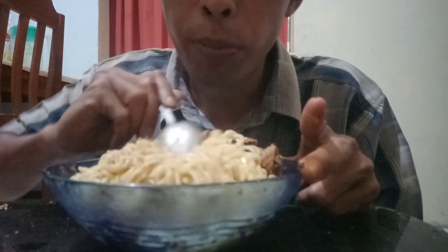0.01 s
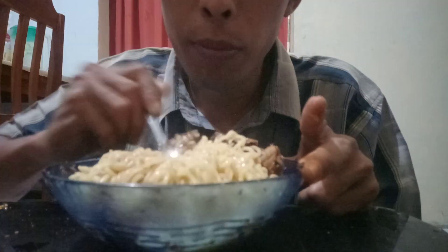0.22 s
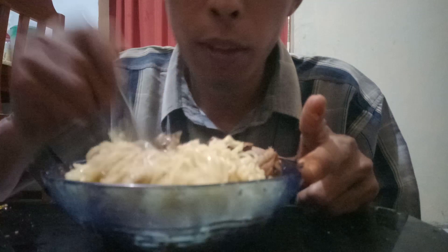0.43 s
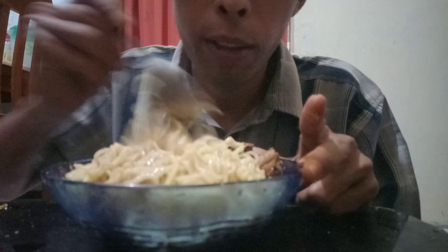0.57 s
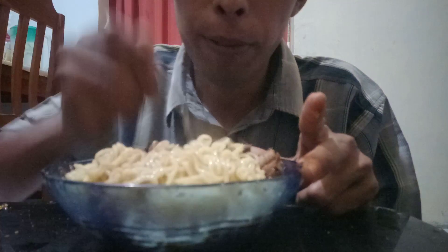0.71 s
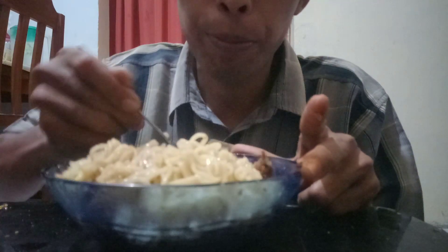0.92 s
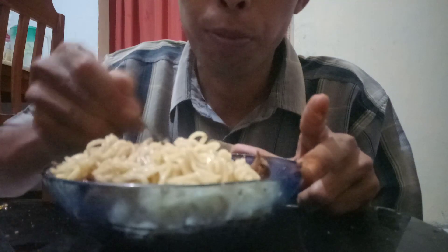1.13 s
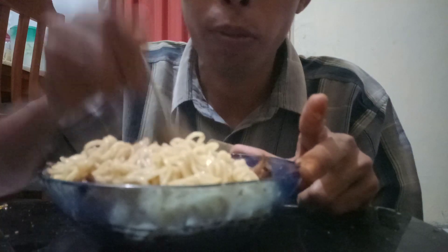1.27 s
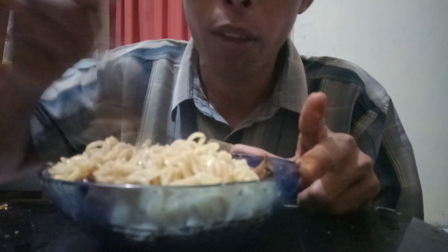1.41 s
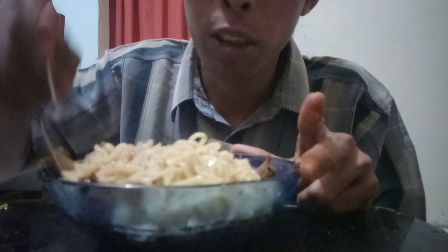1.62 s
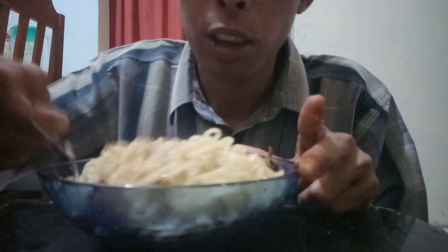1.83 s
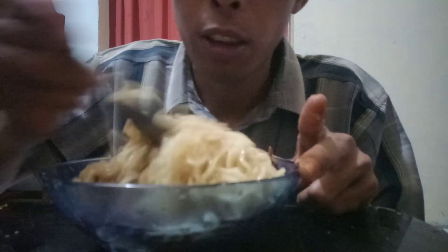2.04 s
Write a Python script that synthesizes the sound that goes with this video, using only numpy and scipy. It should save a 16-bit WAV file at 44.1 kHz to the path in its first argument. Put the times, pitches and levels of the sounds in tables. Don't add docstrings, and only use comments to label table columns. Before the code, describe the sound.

Close up in a small echoing room, a spoon strikes glass sharply, bumps the bowl on the table, goes quieter, then knocks and scrapes again through noodles while crickets and insects sing faintly outside.

```python
import sys
import numpy as np
from scipy import signal
from scipy.fft import rfft, irfft
from scipy.io import wavfile
from scipy.ndimage import uniform_filter1d

SR = 44100
rng = np.random.default_rng(int(sys.argv[2]) if len(sys.argv) > 2 else 0)


def transcribe(signal):
    frames = np.atleast_2d(signal).T
    limited = np.clip(frames, -1, 1)
    pcm = np.round(limited * 32767).astype(np.int16)
    wavfile.write(sys.argv[1], SR, pcm)


def natural_amplitude(level_db):
    exponent = np.asarray(level_db, float) / 20
    return 10 ** exponent


N = 90405
t = np.arange(N) / SR

# frequency in [Hz], level in [dB].
AIR_COLOUR = [(24, -66.5), (40, -10), (222, -5.5), (462, -16), (529, -15.5), (925, -23), (4000, -24.5),
              (5200, -38), (8800, -120)]
AIR_DB, AIR_WANDER_DB = -68.5, 1.5
HISS_DB, TOP_HISS_DB, TOP_HISS_HZ = -89.5, -84, 15200

# centre in [Hz], width in [Hz], level in [dB].
CICADA_BANDS = [(6600, 550, -61), (7216, 420, -66)]
# start in [s], level in [dB].
CHIRPS = [(-.25, -58), (.062, -54), (.3, -50), (.51, -52), (.72, -61.5), (.955, -57.5), (1.19, -58.5),
          (1.405, -60), (1.625, -59.5), (1.85, -59.5)]
STROKES, STROKE_S, STROKE_GAP_S = 4, 0.0181, 0.035
FROM_HZ, TO_HZ, STROKE_SPREAD = 5150, 4348, 0.04
YARD_T60_S, YARD_DB = 0.5, 7
CRICKET_HZ, CRICKET_WIDTH_HZ, CRICKET_BED_DB = 4800, 1000, -67.5

# frequency in [Hz], time to fall 60 dB in [s].
ROOM_T60 = [(300, 0.62), (1200, 0.21), (3500, 0.22), (7000, 0.44), (12000, 0.26)]
ROOM_DB, ROOM_GAP_S = -8.5, 0.0091
WALL_TOP_HZ = 9500
RING_WET_DB = -11

# time in [s], level in [dB].
SHIFT_LEVEL = [(0, -61), (.11, -57), (.15, -79), (.3, -103)]
# centre in [Hz], width in [Hz], level in [dB].
SHIFT_BODY = [(620, 125, -2.5), (830, 77, -8.5), (1180, 410, -10.5)]
# time in [s], level in [dB].
DRAG_LEVEL = [(0, -69.5), (.14, -65.5), (.2, -59.5), (.4, -57), (.47, -79), (.85, -73.5), (1.05, -77),
              (1.43, -92), (1.46, -65), (1.6, -63), (1.75, -57.5), (2.05, -63)]
# centre in [Hz], width in [Hz], level in [dB].
DRAG_BODY = [(543, 400, -7), (954, 161, -1), (1320, 100, -45), (1800, 130, -14.5)]
# time in [s], level in [dB].
SCRAPE_LEVEL = [(0, -66.5), (.215, -74), (.235, -39), (.3, -49), (.36, -64), (.45, -61.5), (.5, -69),
                (1.5, -86), (1.65, -58.5), (1.8, -53.5), (2.05, -58)]
# centre in [Hz], width in [Hz], level in [dB].
SCRAPE_BODY = [(3640, 700, -3.5), (4790, 760, -3.5), (6080, 1270, 5), (2590, 700, -11), (8900, 760, -28.5)]
CLICK_SCATTER_DB = 1.5

# frequency in [Hz], level in [dB], time to fall 60 dB in [s].
SPOON_MODES = [(6710, 0, .09), (6612, -7, .12), (4862, -8, .05), (4160, -5, .04), (7200, -14, .05),
               (5150, -13, .05), (2230, -10, .04), (12100, -38, .1)]
# frequency in [Hz], level in [dB], time to fall 60 dB in [s].
BOWL_MODES = [(6125, -1, .06), (6185, -7, .1), (6400, -6, .04), (3527, 1, .08), (4157, -7, .06),
              (1710, -8, .04), (4895, -10, .04), (1034, -7, .08)]
# frequency in [Hz], level in [dB], time to fall 60 dB in [s].
TABLE_MODES = [(152, -4, .65), (181, 4, .2), (213, -3, .1), (67, -6.5, .11), (129, -1, .14)]
# frequency in [Hz], level in [dB], time to fall 60 dB in [s].
BOARD_MODES = [(256.5, -4, 0.13), (319, -7.5, 0.36), (408.4, -6.5, 0.051), (425, -8, 0.11),
               (549, -2.5, 0.05), (620, 0.5, 0.04), (763, -8, 0.038), (1050, -9, 0.1), (2230, -39, 0.029)]
TABLE_LATE_S = 0.004
HOLD_S, STOP_S, ATTACK_S = 0.0062, 0.0008, 0.000079
SPOON_DAMPED_DB, BOWL_DAMPED_DB = -21, -13

# start in [s], level in [dB], frequency in [Hz], rise time in [s].
TAPS = [(1.6873, -22, 426, 0.00093), (1.6945, -27.5, 416.5, 0.0018), (1.708, -42.5, 455, 0.0052),
        (1.7, -43.5, 1025, 0.0093), (1.752, -47.5, 1050, .005), (1.76, -43.5, 550, 0.0049),
        (1.769, -56, 1000, 0.0024), (0.4707, -39, 199, 0.0029), (.479, -42.5, 289, 0.0042),
        (.488, -48.5, 432.7, 0.0055), (.498, -46.5, 496, 0.0014), (0.57, -52, 198, 0.0035),
        (.55, -64, 620, 0.0055), (0.6972, -34, 191, 0.0016), (.699, -45.5, 1240, 0.0024),
        (.699, -53, 1680, .003), (.699, -45.5, 2580, 0.0015), (.706, -45, 516, 0.0056),
        (.722, -39, 490, 0.002), (0.789, -50, 391, 0.0076), (0.817, -60, 1077, 0.0032),
        (.821, -57, 485, 0.0033), (1.184, -52.5, 491, 0.0036), (1.2, -56.5, 1051, .006),
        (1.208, -50.5, 198, 0.0031), (1.221, -51, 182, 0.0023), (1.232, -63, 1120, 0.0026),
        (1.352, -67, 3330, .0012), (1.353, -57, 5200, 0.00084), (1.3634, -50, 3380, 0.00098),
        (1.363, -51, 5080, .0012), (1.3685, -54, 3180, .0012), (1.383, -48, 3170, 0.0012),
        (1.383, -49.5, 4450, 0.0011), (1.3845, -56.5, 1800, 0.0018), (1.397, -61, 2880, 0.0022),
        (1.401, -63, 2500, 0.002), (1.416, -66, 2950, 0.0014), (1.419, -75, 1780, 0.0017)]
# start in [s], level in [dB], frequency in
# [Hz], time to fall 60 dB in [s].
PINGS = [(0.2064, -38.5, 6700, 0.22), (.25, -54, 319, .5), (.33, -70, 11500, 0.0051),
         (.362, -38, 14700, 0.0068), (0.363, -46, 12700, 0.0068), (.382, -66, 8200, 0.016),
         (.42, -61, 10100, .008), (.445, -66, 11500, .006), (.5, -68, 270, 0.29), (.573, -62, 1800, .026),
         (.675, -57, 15000, .006), (0.698, -31.5, 2230, .019), (.698, -62.5, 8480, .046),
         (.6987, -27.5, 783, 0.023), (.7, -62, 12000, 0.007), (.7, -55, 15200, 0.0066),
         (0.741, -46, 319, 0.47), (.771, -51, 3440, 0.011), (.8, -70, 3500, 0.93),
         (0.94, -69.5, 315.5, 0.79), (1.186, -52.5, 3530, 0.052), (1.186, -47, 4470, 0.026),
         (1.279, -66, 321.3, 1.35), (1.355, -74, 10600, .017), (1.559, -57, 71.5, 0.15),
         (1.689, -33.5, 315, 0.025), (1.748, -37, 4166, 0.034), (1.757, -35, 4116, 0.055),
         (1.7635, -30, 4120, 0.023), (1.759, -26, 6440, 0.016), (1.768, -26, 6570, 0.017),
         (1.756, -52, 13200, .015), (1.7645, -57, 13210, .007), (1.757, -48, 15210, .015),
         (1.79, -52, 322, 1.3), (1.966, -64, 9400, 0.014), (.3, -48.5, 151.7, 1.3), (.54, -52.5, 152, .9),
         (.77, -48.5, 150.9, 1.24), (1.712, -49, 3520, 0.069), (1.714, -34, 6200, 0.078),
         (1.776, -40.5, 6240, 0.1), (1.84, -50, 271, 0.87), (.225, -62, 12000, .12)]
# start in [s], low thud in [dB], top-board knock in [dB],
# noodle slap in [dB], top of the slap in [Hz].
THUDS = [(.094, -55.5, -46, -78, 848), (.2215, -48, -27.5, -33.5, 6600), (.361, -43, -40.5, -50, 1350),
         (.471, -43.5, -46, -55.5, 900), (.572, -50.5, -52, -71, 2200), (.6985, -34.5, -29, -46, 2750),
         (.82, -50, -52, -69, 1200), (1.181, -48.5, -47, -50.5, 5600), (1.449, -81, -60, -66, 1440),
         (1.512, -76, -54, -53.5, 1050), (1.555, -64, -66, -54, 1020), (1.6875, -35.5, -38.5, -62, 520),
         (1.75, -40, -51, -50, 2090), (1.777, -28.5, -53, -72, 600), (.238, -31, -55, -60, 600),
         (1.703, -30, -33, -39, 478)]
SLAP_T60_S, SLAP_LOW_HZ = 0.09, 280
# start in [s], spoon ring in [dB], bowl ring in [dB], contact crack in [dB].
CLINKS = [
    (.2210, -14.5, -48, -21),
    (.381, -65, -56, -42),
    (1.6873, -38, -25, -26),
    (1.704, -82, -36, -52),
    (1.757, -42, -41, -35),
    (1.7645, -64, -43, -37),
]
# frequency in [Hz], level in [dB].
CRACK_COLOUR = [(200, -23), (900, 1), (1550, -11), (2200, -1), (3000, -18), (4400, 1), (7400, -5),
                (8400, -18)]
CRACK_T60_S, GRIT_SAMPLES = 0.06, 8000


def unit(x):
    return x / np.sqrt(np.mean(x ** 2))


def band(x, hz, width, order=1):
    edges = np.clip([hz - width / 2, hz + width / 2], 10, .45 * SR)
    return signal.sosfilt(signal.butter(order, edges, "bandpass", fs=SR, output="sos"), x)


def colour(x, table):
    points = np.array(table, float)
    hz = np.maximum(np.arange(2049) * SR / 4096, 1)
    gain_db = np.interp(np.log(hz), np.log(points[:, 0]), points[:, 1])
    cepstrum = irfft(np.log(natural_amplitude(gain_db)))
    cepstrum[1:2048] *= 2
    cepstrum[2049:] = 0
    return signal.fftconvolve(x, irfft(np.exp(rfft(cepstrum))))[:len(x)]


def curve(table):
    points = np.array(table)
    return natural_amplitude(np.interp(t, points[:, 0], points[:, 1]))


def walk(rate):
    k = int(SR / rate)
    steps = np.repeat(rng.standard_normal(N // k + 1), k)
    return unit(uniform_filter1d(uniform_filter1d(steps, k), k)[:N])


def add(out, s, sound):
    i = int(s * SR)
    out[i:i + len(sound)] += sound[:N - i]


def noise_band(hz, width, order=1):
    return unit(band(rng.standard_normal(N), hz, width, order))


def air():
    tone = unit(colour(rng.standard_normal(N), AIR_COLOUR + [(8000, -43.5)]))
    tone = tone * natural_amplitude(AIR_DB + AIR_WANDER_DB * walk(8.15))
    hiss = noise_band(9700, 1800) * natural_amplitude(HISS_DB)
    return tone + hiss + noise_band(TOP_HISS_HZ, 1200, order=2) * natural_amplitude(TOP_HISS_DB)


def crickets():
    lead = SR // 2
    u = t[:int(STROKE_S * SR)]
    dry = np.zeros(N + SR)
    turns = FROM_HZ * u + (TO_HZ - FROM_HZ) * u ** 2 / (2 * STROKE_S)
    swell = np.sin(np.pi * u / STROKE_S) ** 2
    for s, db in CHIRPS:
        for j in range(STROKES):
            i = int((s + .5 + j * STROKE_GAP_S) * SR)
            pitch = 1 + STROKE_SPREAD * rng.standard_normal()
            stroke_db = db + 1.9 * rng.standard_normal() - 2.9 * j
            dry[i:i + len(u)] += natural_amplitude(stroke_db) * np.sin(2 * np.pi * turns * pitch) * swell
    yard = rng.standard_normal(SR) * natural_amplitude(-60 * t[:SR] / YARD_T60_S)
    echo = signal.fftconvolve(dry, yard / np.sqrt(np.sum(yard ** 2)))[:N + SR]
    wet = dry + natural_amplitude(YARD_DB) * echo
    return wet[lead:lead + N]


def insect_chorus():
    out = noise_band(CRICKET_HZ, CRICKET_WIDTH_HZ, order=4) * natural_amplitude(CRICKET_BED_DB)
    for hz, width, db in CICADA_BANDS:
        grain_db = 0.98 * walk(7.6) + 1.34 * walk(80)
        out += noise_band(hz, width, order=3) * natural_amplitude(db + grain_db)
    return out


def room(x):
    u = t[:SR]
    tail = sum(band(rng.standard_normal(SR), hz, hz * 2.1) * natural_amplitude(-60 * u / t60) for hz, t60 in ROOM_T60)
    tail = signal.sosfilt(signal.butter(2, WALL_TOP_HZ, fs=SR, output="sos"), tail)
    tail = tail * np.clip(u / ROOM_GAP_S - 1, 0, 1)
    return natural_amplitude(ROOM_DB) * signal.fftconvolve(x, tail / np.sqrt(np.sum(tail ** 2)))[:N]


def rub(level, body, rate):
    hits = rng.random(N) < rate / SR
    clicks = hits * rng.standard_normal(N) * natural_amplitude(CLICK_SCATTER_DB * rng.exponential(size=N))
    out = np.zeros(N)
    for hz, width, db in body:
        out += natural_amplitude(db + 2.2 * walk(16)) * unit(band(clicks, hz, width, order=2))
    return unit(out) * curve(level)


def ring(modes, late_s=0., damped_db=0, luck=None):
    if luck is None:
        luck = rng.standard_normal((2, len(modes)))
    u = t[:SR // 2]
    out = np.zeros(len(u))
    for (hz, db, t60), scatter, phase in zip(modes, *luck):
        rise_s = ATTACK_S + late_s * min(150 / hz, hz / 150) ** 2
        swell = (1 - np.exp(-u / rise_s)) ** 2
        out += natural_amplitude(db + 1.5 * scatter) * np.sin(2 * np.pi * hz * u + phase) * natural_amplitude(-60 * u / t60) * swell
    stop = natural_amplitude(damped_db / (1 + np.exp(np.clip((HOLD_S - u) / STOP_S, -50, 50))))
    return stop * out


def tap(hz, db, rise_s):
    u = t[:int(12 * rise_s * SR)]
    return -natural_amplitude(db) * u / rise_s * np.exp(1 - u / rise_s) * np.sin(2 * np.pi * hz * u)


def taps():
    out = np.zeros(N)
    for s, db, hz, rise_s in TAPS:
        add(out, s, tap(hz, db, rise_s))
    return out


def pings():
    out = np.zeros(N)
    for s, db, hz, t60 in PINGS:
        add(out, s, ring([(hz, db, t60)], luck=np.zeros((2, 1))))
    return out


def thuds():
    low, slaps = np.zeros(N), np.zeros(N)
    u = t[:GRIT_SAMPLES]
    fade = (natural_amplitude(-60 * u / 0.072) + 1.27 * natural_amplitude(-60 * u / SLAP_T60_S)) * np.clip(u / ATTACK_S / 2, 0, 1)
    for s, low_db, board_db, slap_db, top_hz in THUDS:
        add(low, s, natural_amplitude(low_db) * ring(TABLE_MODES, TABLE_LATE_S) / 2)
        board = [mode for mode in BOARD_MODES if mode[0] < top_hz]
        add(slaps, s, natural_amplitude(board_db) * ring(board, TABLE_LATE_S) / 2)
        grit = rng.standard_normal(GRIT_SAMPLES) * fade
        slap = band(grit, (top_hz + SLAP_LOW_HZ) / 2, top_hz - SLAP_LOW_HZ, order=4)
        add(slaps, s, natural_amplitude(slap_db) * slap * np.sqrt(8000 / top_hz))
    return low, slaps


def clinks():
    rings, cracks = np.zeros(N), np.zeros(N)
    u = t[:GRIT_SAMPLES]
    fade = natural_amplitude(-60 * u / CRACK_T60_S) * np.clip(u / ATTACK_S, 0, 1)
    for s, spoon_db, bowl_db, crack_db in CLINKS:
        add(rings, s, natural_amplitude(spoon_db) * ring(SPOON_MODES, damped_db=SPOON_DAMPED_DB))
        add(rings, s, natural_amplitude(bowl_db) * ring(BOWL_MODES, damped_db=BOWL_DAMPED_DB))
        add(cracks, s, natural_amplitude(crack_db) * rng.standard_normal(GRIT_SAMPLES) * fade)
    return rings, colour(cracks, CRACK_COLOUR)


def scene():
    clink_rings, cracks = clinks()
    low, slaps = thuds()
    rings = clink_rings + pings()
    noisy = slaps + taps() + cracks
    near = rings + low + noisy
    echo = room(natural_amplitude(RING_WET_DB) * rings + noisy)
    drag = rub(DRAG_LEVEL, DRAG_BODY, 1800)
    scrape = rub(SCRAPE_LEVEL, SCRAPE_BODY, 4500)
    shift = rub(SHIFT_LEVEL, SHIFT_BODY, 1000)
    mix = near + echo + drag + scrape + shift + crickets() + insect_chorus() + air()
    return mix[None]


def top_cut(x):
    return signal.sosfilt(signal.butter(12, 16970, fs=SR, output="sos"), x)


def record(dry):
    cut = signal.sosfilt(signal.butter(2, 55, "highpass", fs=SR, output="sos"), dry)
    soft = signal.sosfilt(signal.ellip(8, .2, 22, 15850, fs=SR, output="sos"), cut)
    return top_cut(soft)


dry = scene()
out = record(dry)
transcribe(out)
```